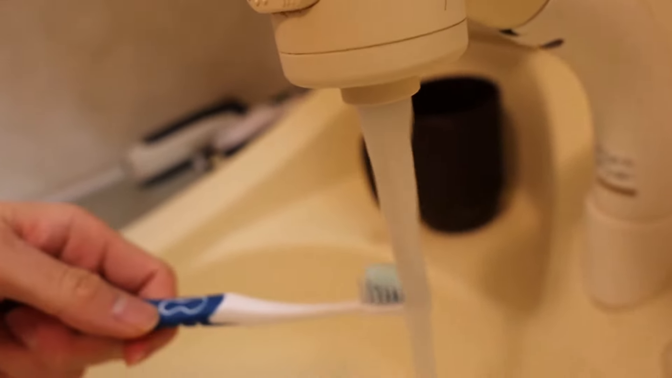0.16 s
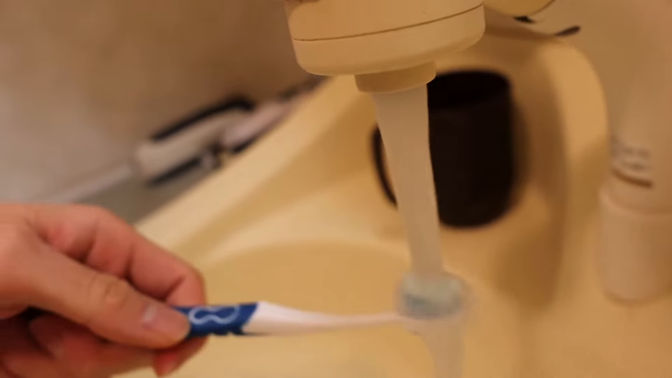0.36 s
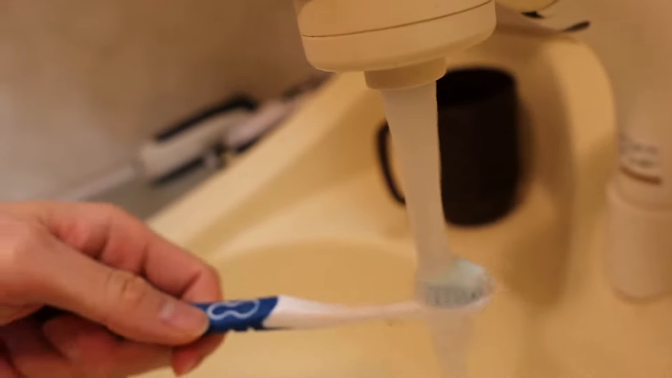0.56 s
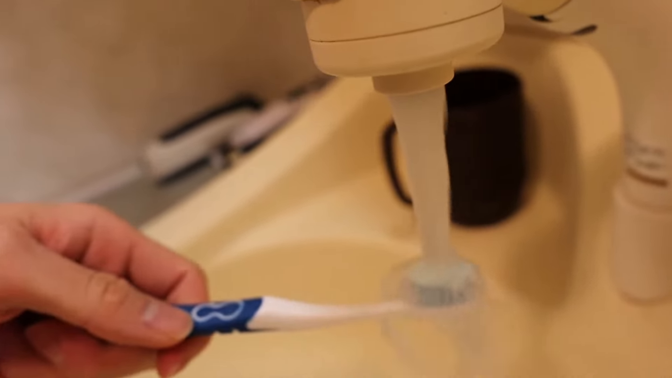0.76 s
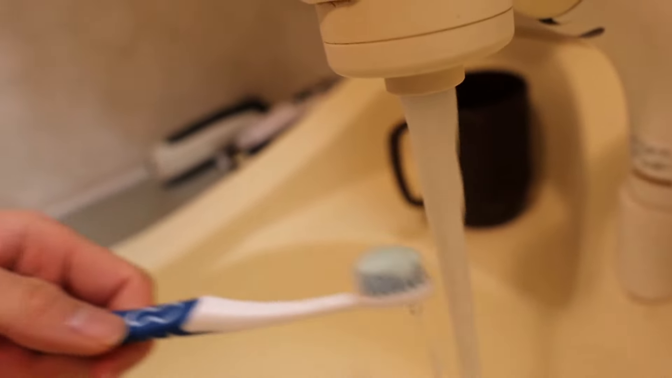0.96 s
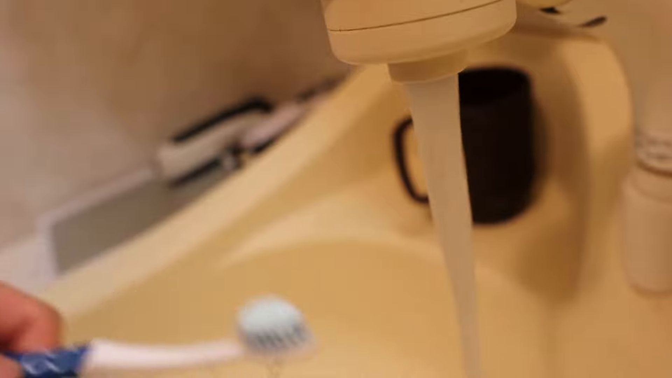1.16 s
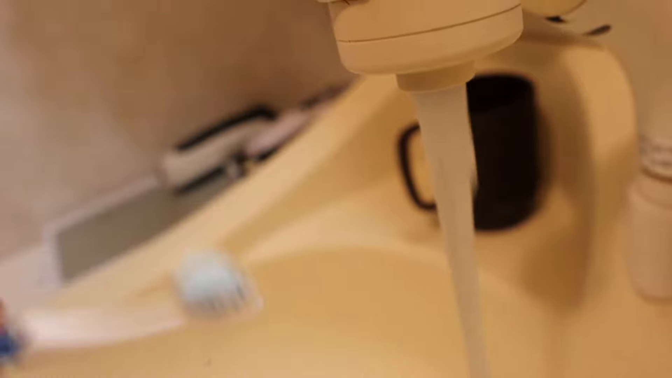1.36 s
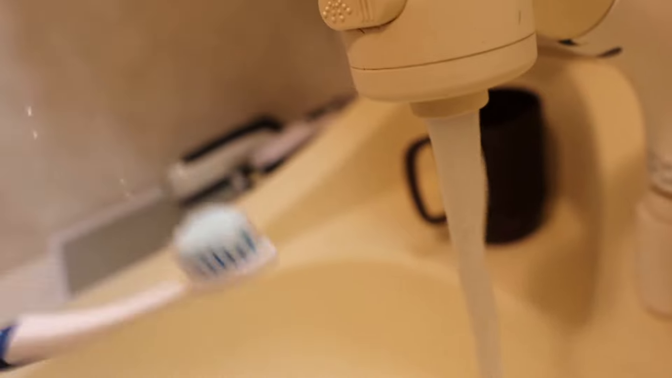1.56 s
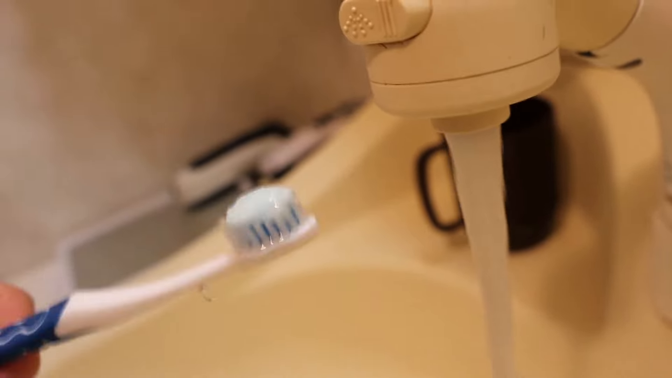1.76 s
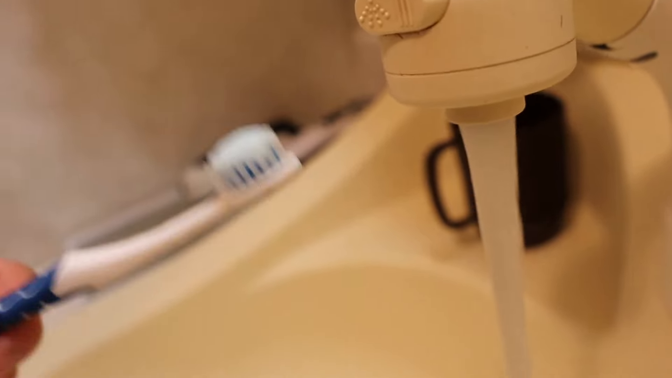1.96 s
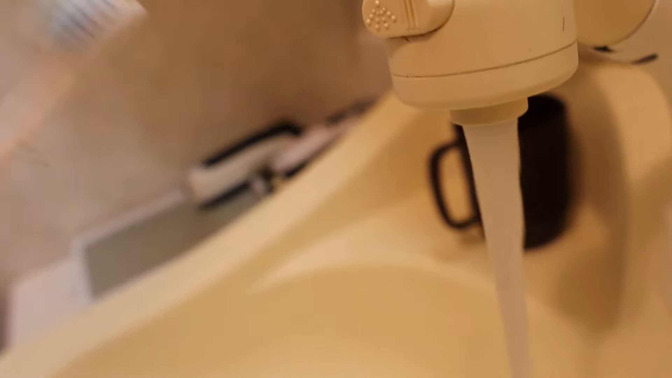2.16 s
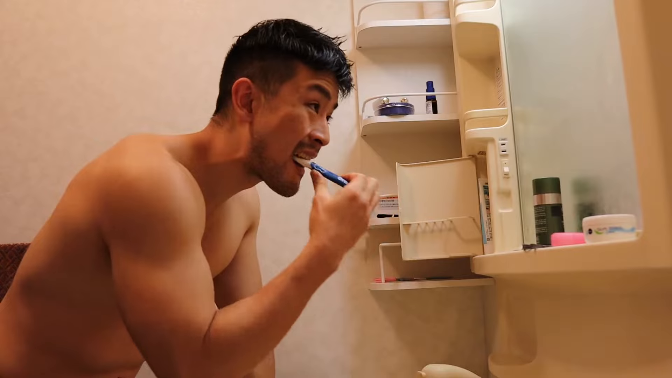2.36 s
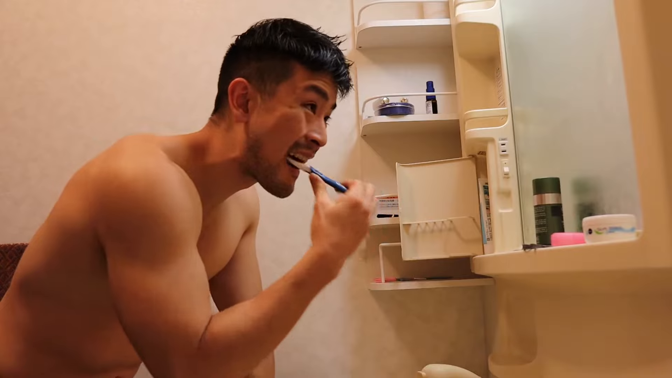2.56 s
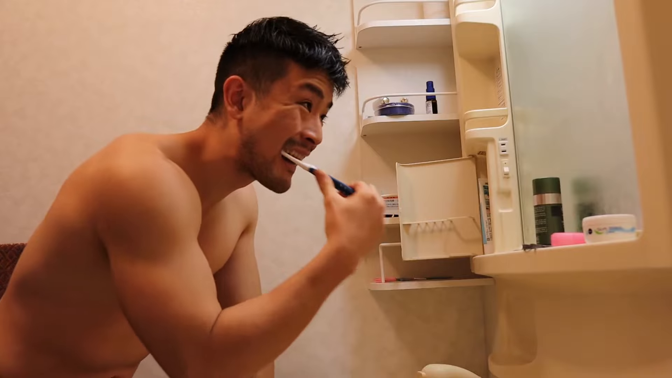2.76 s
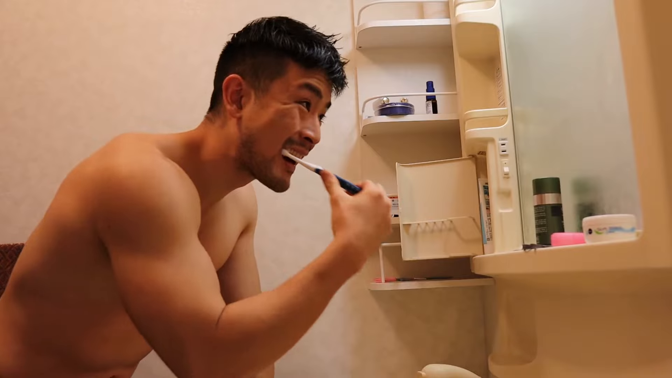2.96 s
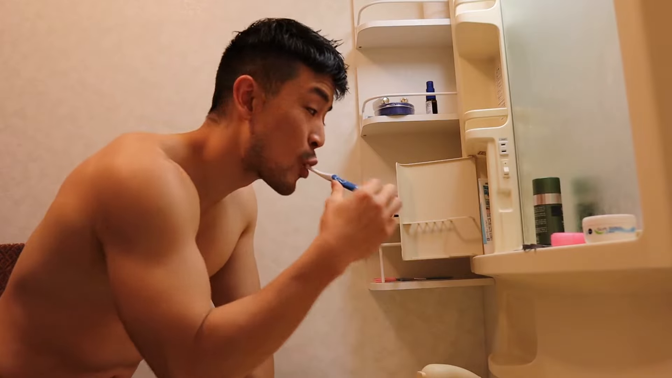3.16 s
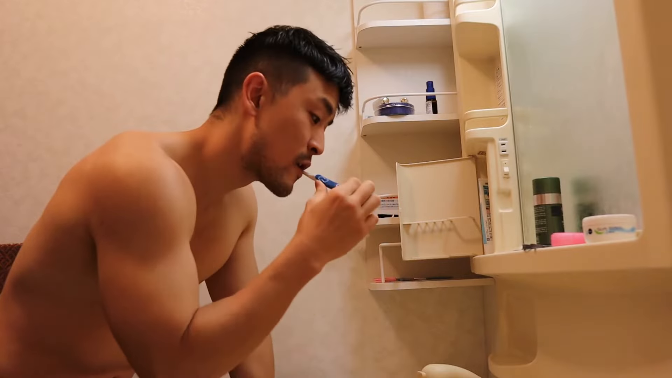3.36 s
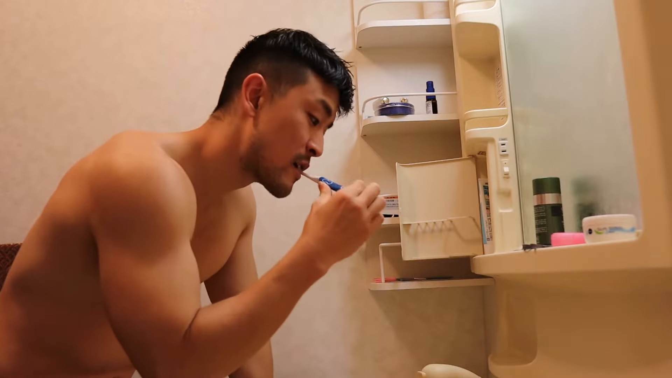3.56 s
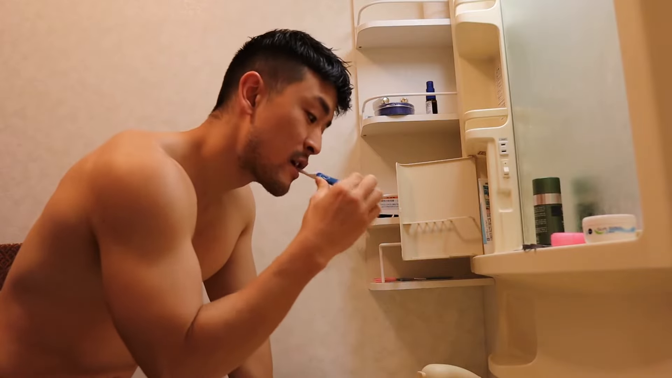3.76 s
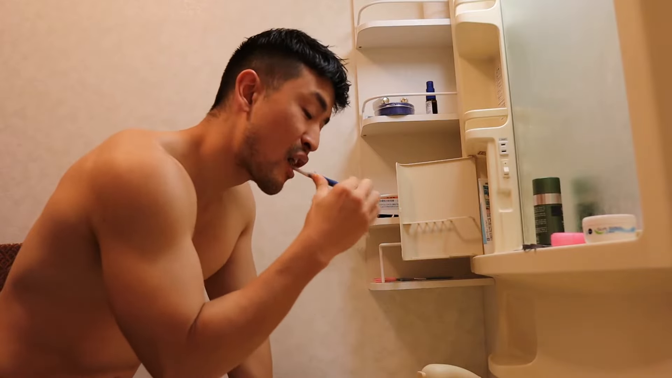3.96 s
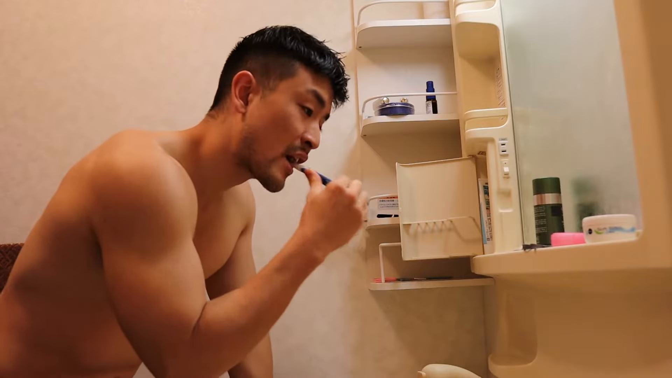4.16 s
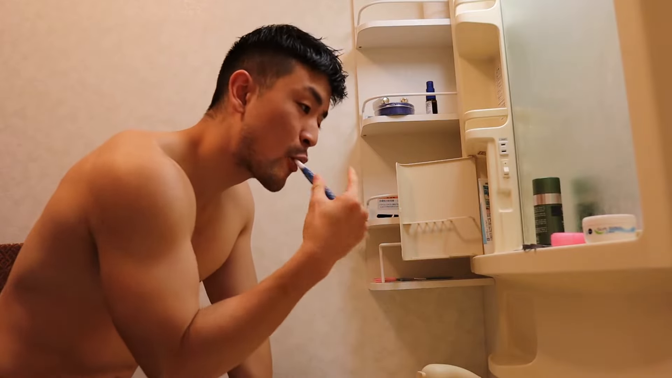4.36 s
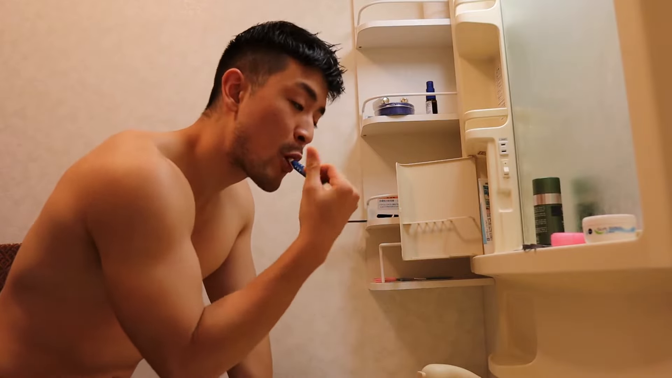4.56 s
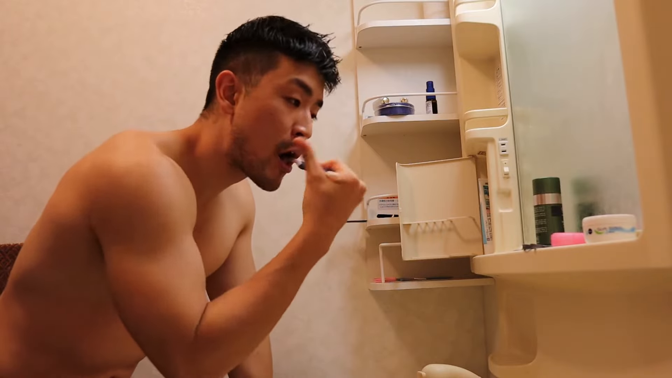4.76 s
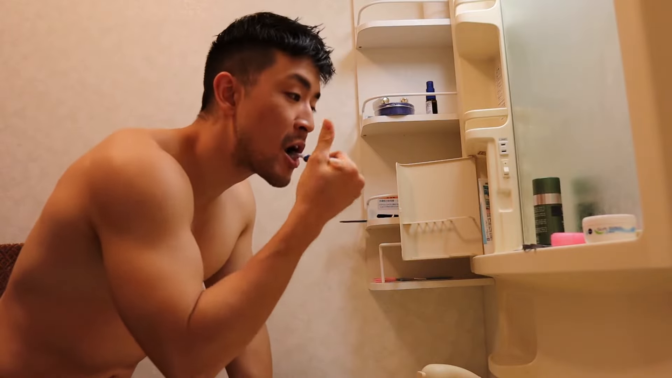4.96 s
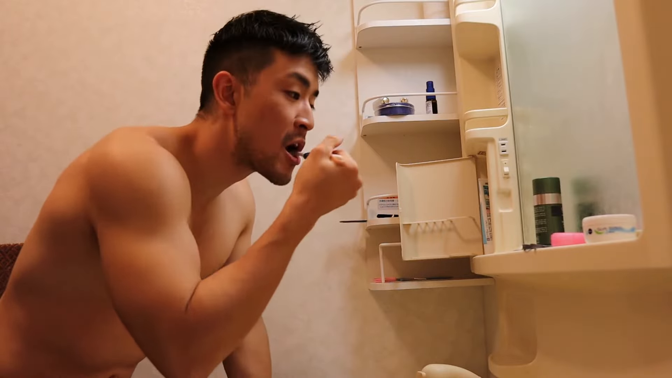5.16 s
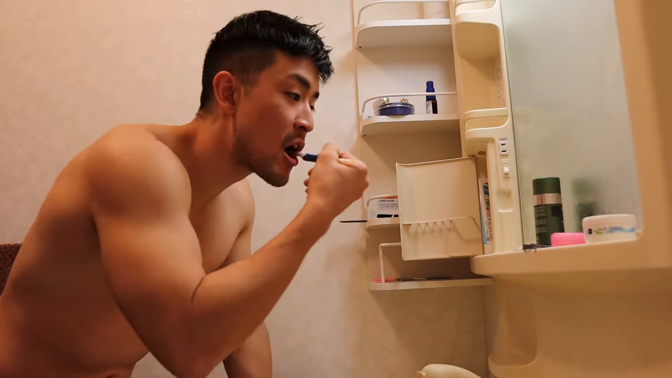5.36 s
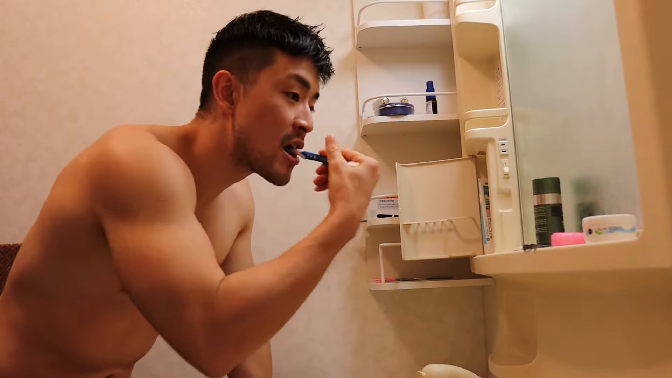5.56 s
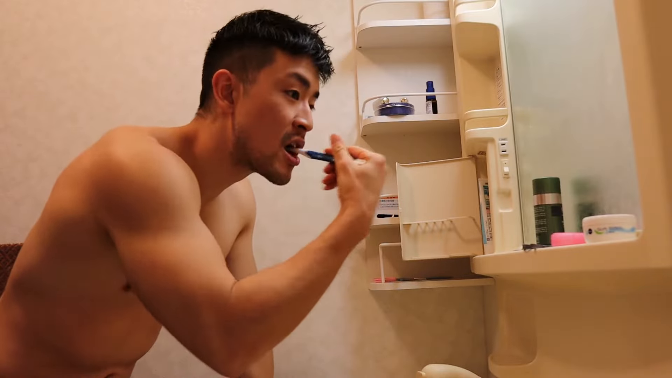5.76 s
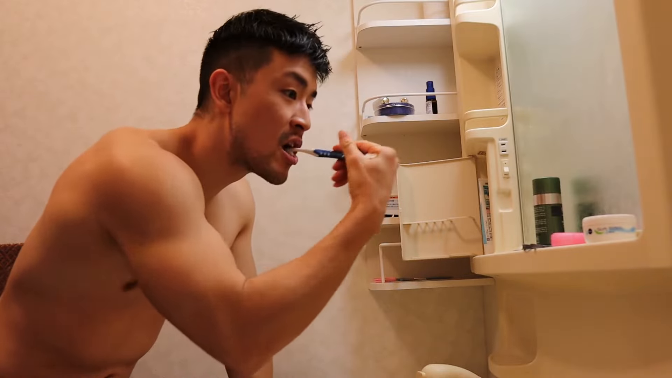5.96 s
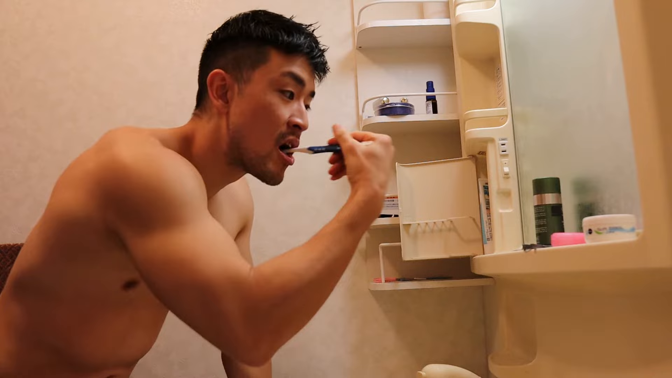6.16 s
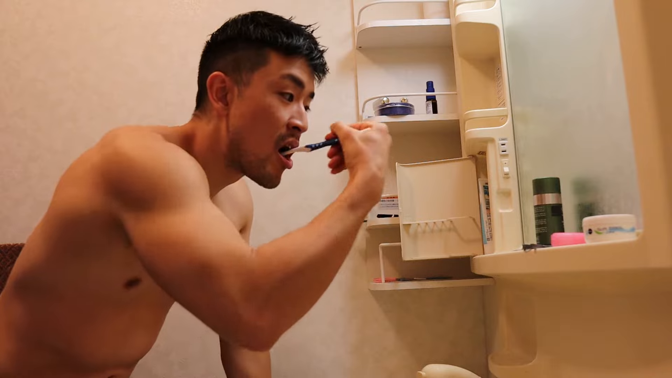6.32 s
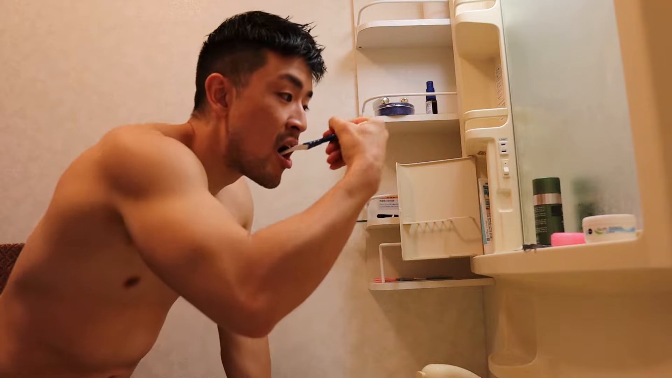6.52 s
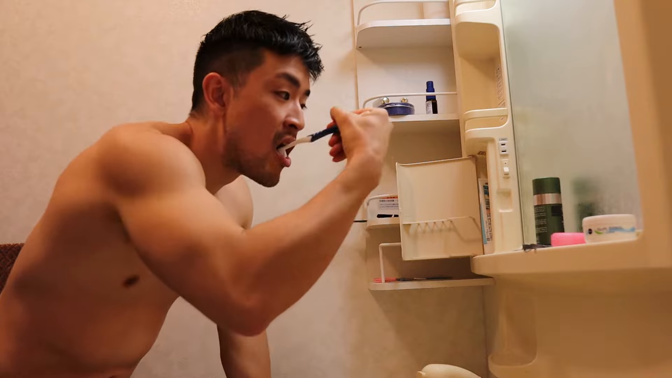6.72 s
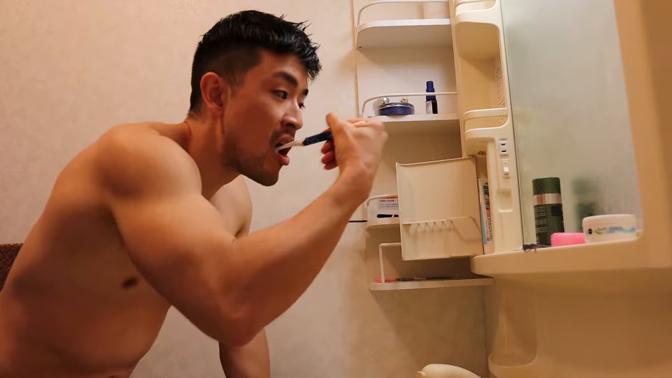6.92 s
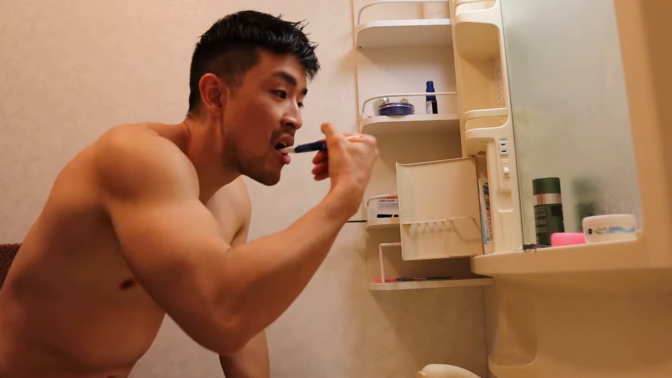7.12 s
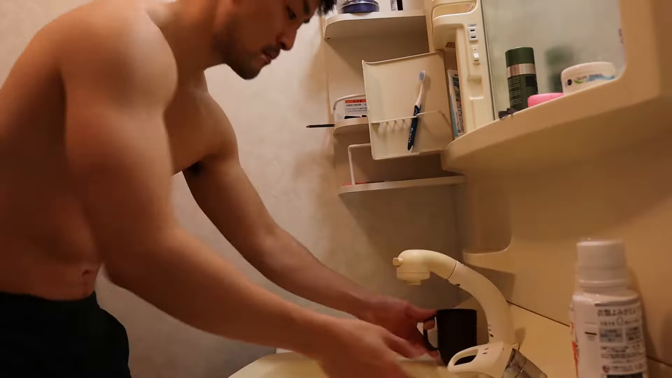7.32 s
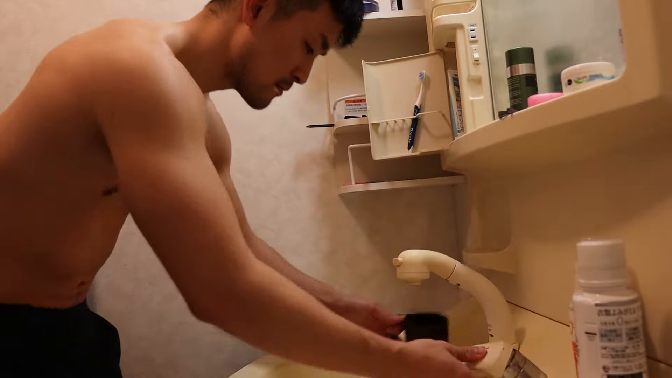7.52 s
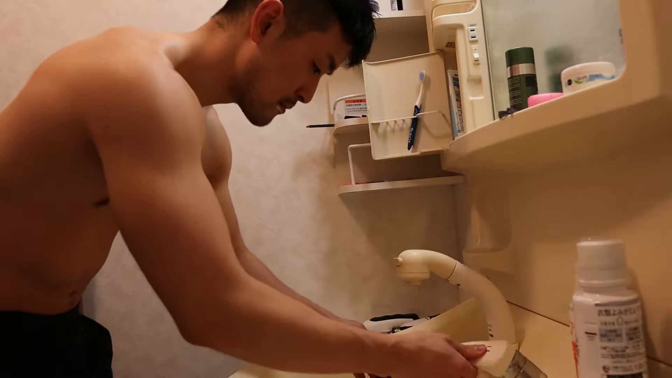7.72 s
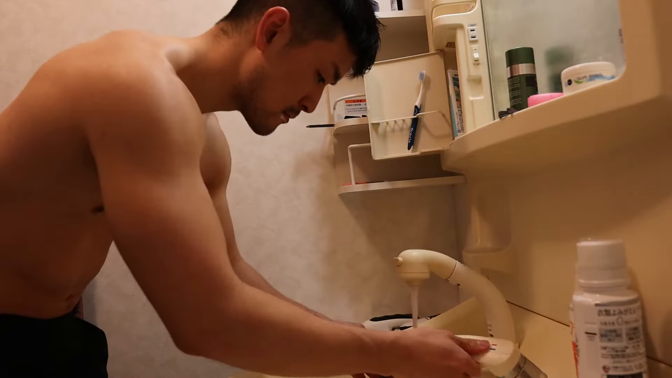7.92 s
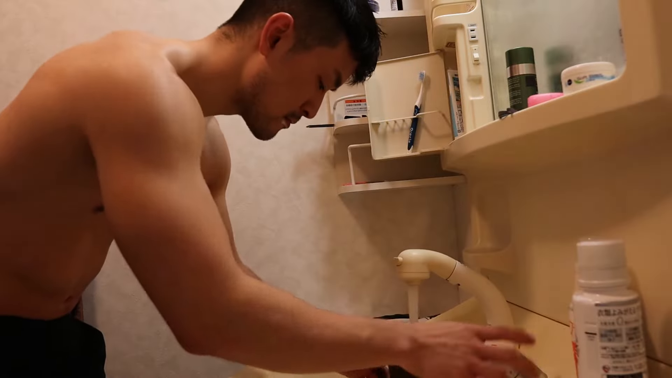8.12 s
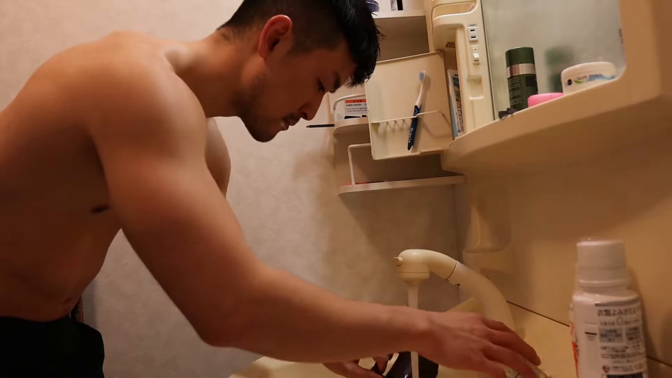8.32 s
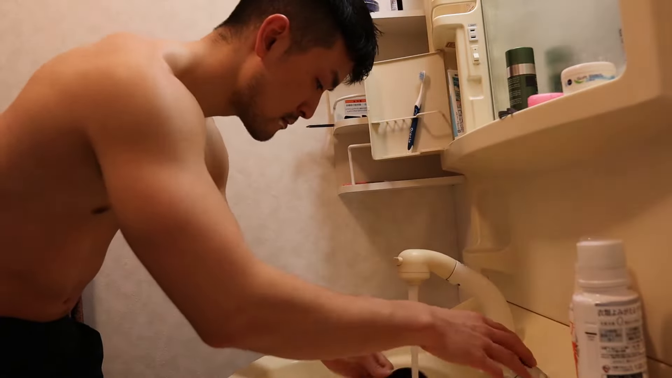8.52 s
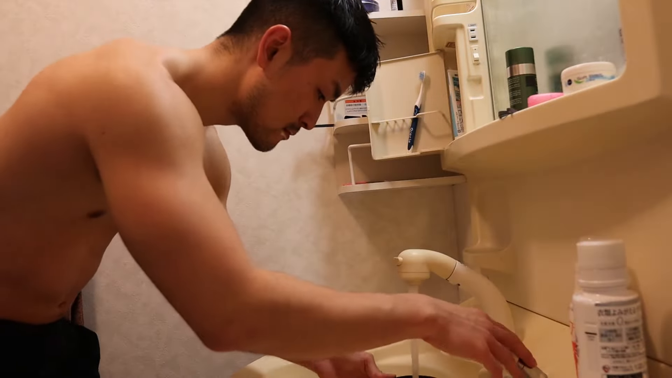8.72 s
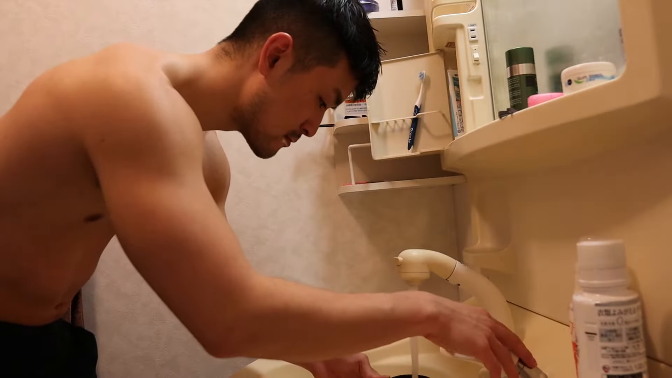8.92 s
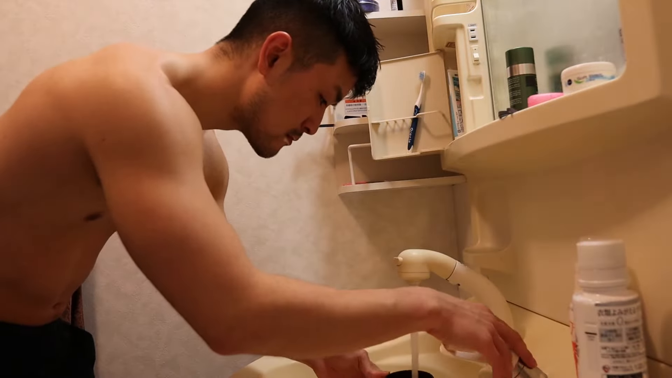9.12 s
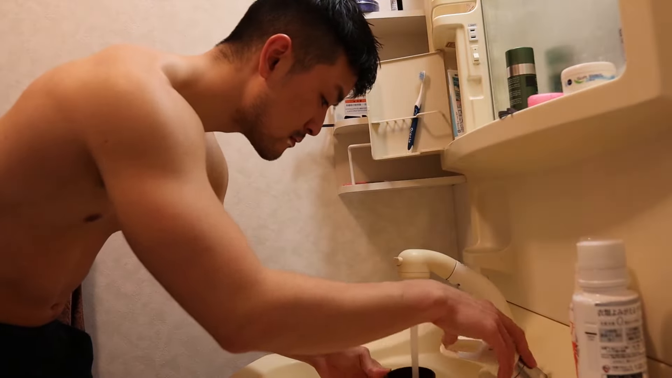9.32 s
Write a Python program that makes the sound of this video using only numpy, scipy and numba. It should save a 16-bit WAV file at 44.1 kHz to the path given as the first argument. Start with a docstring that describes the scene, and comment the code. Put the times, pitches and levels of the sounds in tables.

```python
"""Teeth are scrubbed close by, in bouts of mostly eleven to thirteen strokes a second, in a small bathroom:
bristle flicks excite the moving resonances of a mouth. Before that a tap runs into a plastic basin and
spatters on the toothbrush: random impacts, bubbles and splashes. Afterwards a mug scuffs and knocks in the
basin, as ringing modes, and the tap runs over its rim and into it. Mains hum and ventilation lie underneath."""
import sys
import numpy as np
from scipy import signal
from scipy.fft import rfft, irfft, next_fast_len
from scipy.io import wavfile
from scipy.ndimage import uniform_filter1d, map_coordinates
from numba import njit

SR = 44100
rng = np.random.default_rng(int(sys.argv[2]) if len(sys.argv) > 2 else 0)


def unload_wav(signal):
    """Save mono or channel-first audio to the path in sys.argv[1] as 16-bit WAV at rate SR, clipped to [-1, 1]."""
    wavfile.write(
        sys.argv[1],
        SR,
        np.round(np.clip(np.atleast_2d(signal).T, -1, 1) * 32767).astype(np.int16),
    )


N = 418068
TIME = np.arange(N) / SR  # s

# Levels here are relative: the functions trim and vary them.
# The near tap and the brushing stop short; the tap opens again [s].
NEAR_END_S, BRUSH_END_S, FAR_START_S = 2.283, 7.285, 7.89
TOP_HZ = 15850  # upper limit of the microphone's band

# Mains hum: (time [s], level [dB])
HUM_LEVEL = [(0, -68), (2.27, -69.5), (2.29, -58), (7.24, -58.5), (7.29, -53.5), (9.48, -53.5)]
# Rush of ventilation: (frequency [Hz], density [dB per Hz])
AIR_SPECTRUM = [(25, -2), (100, -4), (170, -3), (310, 1), (470, -2.5), (600, -11.5), (1000, -0.5),
                (2000, -5.5), (5000, -12.5), (15000, -20)]
# Reverberation between close hard walls: (frequency [Hz], t60 [s])
ROOM_DECAY = [(150, 0.43), (400, 0.37), (1000, 0.51), (3500, 0.48), (12000, 0.28)]

# Bumps and knocks on the basin: (time [s], level [dB], hardness of the contact [Hz])
BASIN_KNOCKS = [(3.256, -51.5, 600), (6.065, -41.5, 600), (7.562, -24.5, 5900), (7.568, -10, 560),
                (7.584, -23, 1800), (7.601, -25, 560), (7.681, -20.5, 600), (7.843, -36.5, 700),
                (8.036, -30, 800), (8.391, -29.5, 280)]
# Modes of the basin and the mug in it: (frequency [Hz], level [dB], t60 [s])
BASIN_MODES = [(92, -19, 0.26), (150, -15, 0.088), (228.7, -8.5, 0.18), (301, -6.5, 0.17),
               (278.7, -4, 0.11), (335, 0, 0.039), (379.5, -12, 0.1), (456, -12, 0.067), (793, -5.5, 0.047),
               (862, -4, 0.063), (907, -12, 0.062), (1137, -6.5, 0.039), (1650, -1.5, 0.017),
               (3080, -2, 0.019), (3540, -12, 0.2), (3740, -5, 0.021), (4700, -29, .2)]
# The mug scuffs as it is handled: (time [s], level [dB], length [s])
MUG_SCUFFS = [(7.294, -39, 0.011), (7.37, -34.5, 0.00326), (7.396, -40, 0.011)]
# Resonances of the scuffed mug: (frequency [Hz], width [Hz], level [dB])
SCUFF_MODES = [(355, 125, -5.5), (814, 93, 2.5), (1300, 150, -11), (1980, 880, -18.5)]

# The stream meets a new surface as the mug moves, last of all its inside:
# (time [s], gurgle level [dB], spray level [dB], drumming level [dB], surge [dB])
STREAM_LANDINGS = [(7.903, -52, -54, -65, 15), (8.043, -46.5, -43, -70, 8), (8.19, -42, -44.5, -67.5, 4.5),
                   (8.387, -41.5, -32.5, -50, 0), (8.735, -39, -38, -67, -2.5)]
# The stream dips into the mug and rings its air: (time [s], length [s], level [dB])
MUG_AIR_RINGS = [(8.28, 0.021, -37.5), (8.77, .135, -40)]
# Trapped air gurgles out as the tap opens: (time [s], length [s], level [dB], pitch [Hz])
TAP_COUGH = (7.895, .04, -45, 1080)
# Water churning in the mug: (frequency [Hz], density [dB per Hz])
GURGLE_SPECTRUM = [(200, -16.5), (550, -12), (800, -7), (1000, -6.5), (1170, -3.5), (1400, -9), (2300, -1),
                   (3000, -3.5), (3700, -1), (4400, -7), (5400, -3.5), (7500, -18.5), (15000, -16)]
# Water spraying off the rim: (frequency [Hz], density [dB per Hz])
SPRAY_SPECTRUM = [(900, -31), (2600, -12), (3500, 2), (4400, -4), (5500, 1.5), (7800, -0.5), (9500, -6),
                  (12000, -6), (14500, -12.5), (16000, -19)]
# Water drumming on the basin: (frequency [Hz], density [dB per Hz])
DRUM_SPECTRUM = [(70, -22), (130, -7), (210, -2.5), (340, -5), (480, -12.5), (1500, -42)]
SETTLE_S, SHIFT_S = 0.039, .008  # a surge dies away; the stream crosses to the next surface
# The water deepens in the mug and cushions the stream; the full mug spills onto the basin.
DEEPEN_S, GURGLE_LOSS_DB, SPRAY_LOSS_DB, OVERFLOW_DB = 0.47, 5.5, 12.5, 8
SPUTTER_DB, SPUTTER_RATE = 0.86, 35  # uneven churning: depth, random knots a second
MUG_HZ, MUG_WIDTH_HZ, MUG_ATTACK_S, MUG_RELEASE_S = 842, 63, 0.0096, 0.025
GLUG_START_S, GLUG_DB, GLUG_FADE_DB_PER_S = 8.85, -42, 23  # large bubbles, once there is water to trap them

# Loudest drops bursting near the tap: (time [s], level [dB], pitch [Hz])
DROP_SPLASHES = [(0.1027, -33, 6100), (0.1176, -21.5, 6440), (0.385, -24.5, 5520), (0.9098, -26, 6050),
                 (1.3259, -27, 5470), (1.3737, -29, 3610), (1.5539, -28.5, 6500), (1.6676, -25.5, 5440),
                 (1.717, -29, 3940), (1.7384, -23, 4100), (2.1809, -26.5, 3460), (2.2204, -25, 5640)]
# One large bubble in the drain: (time [s], level [dB], pitch [Hz])
DRAIN_PLOP = (.312, -49, 580)
# Stream hissing on the basin: (frequency [Hz], density [dB per Hz])
STREAM_SPECTRUM = [(100, -14.5), (300, -10.5), (520, -14), (700, -9), (820, -4), (950, -6.5), (1200, 3),
                   (1360, -3.5), (1600, -4), (3000, -5.5), (6000, -5), (9000, -10), (13000, -8.5),
                   (16000, -15.5)]
# Bursts of spatter: (frequency [Hz], density [dB per Hz])
SPATTER_SPECTRUM = [(700, -37), (1600, -15.5), (2300, -3.5), (3300, -6.5), (4000, 3.5), (4600, -3.5),
                    (5600, 3.5), (6700, 2), (7600, -5.5), (10000, -6.5), (16000, -16)]
# Water spills off the brush and drums on the basin: (time [s], level [dB], half length [s])
BRUSH_SPILLS = [(0.661, -53.5, 0.044), (.8, -60.5, 0.035), (1.012, -54, 0.069), (1.197, -65, 0.057)]
SPATTER_DB, DRUM_DB = -42, -68.5  # the bare stream on the basin
# The bristles sit in the stream and soften its spatter: middle, half length, loss.
CUSHION_S, CUSHION_HALF_S, CUSHION_DB = .66, .23, 4

# Bouts of back-and-forth brushing:
# (first stroke [s], last stroke [s], number of strokes, return stroke comes early by [s])
BRUSH_BOUTS = [(2.303, 3.272, 12, .002), (3.414, 4.425, 12, .008), (4.657, 4.795, 2, 0),
               (4.907, 6.172, 16, 0), (6.326, 7.268, 13, .011)]
# How hard the brush bears and where it sits:
# (time [s], pressure level [dB], mouth cavity over that [dB], teeth over that [dB])
BRUSH_PRESSURE = [(2.3, -55, 6.5, 0.5), (2.4, -51, 6, 3), (2.66, -51.5, 5.5, 5.5), (2.8, -57, 6.5, 6.5),
                  (3.02, -56.5, 7, 6.5), (3.1, -60, 4, 0), (3.28, -55, 2, 0), (3.42, -57, 7, -1),
                  (3.62, -50, 5, 0), (3.97, -51, 7, 2), (4.3, -54, 16, 6.5), (4.42, -65.5, 9, 5),
                  (4.65, -75, 16, -4), (4.79, -54, 10.5, 5), (5.12, -54, 14, 2.5), (5.6, -56, 11, 5.5),
                  (5.85, -51.5, 3, 7.5), (6.2, -54.5, 6, 2.5), (6.87, -53.5, 0.5, 5.5),
                  (7.22, -64, 10.5, 9.5), (7.27, -55.5, 16, 7.5)]
# The lips open and round: (time [s], mouth cavity resonance [Hz])
LIPS = [(2.28, 1310), (2.7, 1444), (3.04, 1356), (3.26, 725), (3.37, 960), (3.55, 1190), (4.05, 1297),
        (4.33, 1280), (4.44, 850), (4.57, 1050), (4.64, 760), (4.76, 1190), (5.58, 1202), (5.84, 1068),
        (6.5, 944), (7.27, 990)]
# The tongue moves: (time [s], second resonance of the mouth [Hz])
TONGUE_PLACE = [(2.7, 2570), (3.04, 2420), (3.38, 1900), (4.05, 1790), (4.22, 2400), (4.7, 1870),
                (5.25, 1870), (5.84, 2810), (6.8, 2920), (7.27, 2530)]
# The brush head clicks against the teeth: (time [s], mouth cavity level [dB], tick level [dB])
TEETH_CLICKS = [(2.895, -46, -39), (3.255, -45, -28), (4.116, -34, -35), (4.419, -40.5, -39),
                (4.586, -47, -36.5), (4.756, -44, -32), (4.981, -35, -45), (5.232, -32, -28),
                (5.725, -39, -30.5), (6.159, -42, -44), (6.464, -44, -35)]
# Hiss of the bristles: (frequency [Hz], density [dB per Hz])
BRISTLE_SPECTRUM = [(500, -30), (1550, -22), (1900, -7), (2900, -12), (3900, -3), (4300, -4.5), (4700, 2.5),
                    (5200, -3.5), (6600, -2), (7600, -8), (9500, -12.5), (11000, -11), (13500, -13.5),
                    (16000, -26)]
# Half width as a share of the period, steepness, power left at the turn.
STROKE_WIDTH, STROKE_EDGE, TURN_REST = .25, 3.06, .02
# No two strokes alike: level, share by which the resonances move.
STROKE_SCATTER_DB, JAW_SWAY = 1.26, .021
THIRD_HZ, FOURTH_HZ, FIFTH_HZ = 3288, 3654, 5680  # the upper resonances of the mouth hardly move


def amp(db):
    """Decibels to gain."""
    return 10 ** (np.asarray(db) / 20)


def unit(x):
    """Scale to rms 1."""
    return x / np.sqrt(np.mean(x ** 2) + 1e-20)


def along(points, hz):
    """Read (frequency [Hz], value) points on a log axis."""
    f, v = np.transpose(points)
    return np.interp(np.log(hz + 1), np.log(f + 1), v)


def curves(rows):
    """One value per sample for each column after the time."""
    s, *cols = np.transpose(rows)
    return [np.interp(TIME, s, c) for c in cols]


def wobble(rate):
    """A smooth random curve, rate knots a second."""
    knots = rng.standard_normal(int(N * rate / SR) + 4)
    return map_coordinates(knots, [TIME * rate], order=2)


def swell(s, half_s, edge):
    """A rounded bump of height 1 around time s; a higher edge makes it squarer."""
    return np.exp(-np.abs((TIME - s) / half_s) ** edge)


def add(track, s, sound):
    """Mix a sound into the track from time s."""
    part = track[max(round(s * SR), 0):][:len(sound)]
    part += sound[:len(part)]


def colour(x, spectrum):
    """Causal (minimum-phase) filter with the given spectrum; the result has rms 1."""
    m = 2 * next_fast_len(N // 2 + SR // 8)
    cepstrum = irfft(np.log(amp(along(spectrum, np.fft.rfftfreq(m, 1 / SR)))), m)
    cepstrum[1:m // 2] *= 2
    cepstrum[m // 2 + 1:] = 0
    return unit(irfft(rfft(x, m) * np.exp(rfft(cepstrum)), m)[:N])


@njit
def sweep(x, turn, radius):
    """A two-pole band-pass whose centre and width move from sample to sample."""
    y = np.zeros(len(x))
    for i in range(2, len(x)):
        r = radius[i]
        y[i] = (1 - r) * (x[i] - x[i - 2]) + 2 * r * np.cos(turn[i]) * y[i - 1] - r * r * y[i - 2]
    return y


def resonate(x, hz, width_hz):
    """A resonance of peak gain about 1, fixed or moving."""
    turn = 2 * np.pi * hz / SR * np.ones(N)
    return sweep(x, turn, np.exp(-np.pi * width_hz / SR) * np.ones(N))


def hollow(x, hz, width_hz, skirt):
    """A resonance with steep sides: a second one, skirt times as wide, darkens the valleys."""
    return resonate(resonate(x, hz, width_hz), hz, width_hz * skirt)


def patter(rate, spread_db):
    """Tiny impacts at random times and of clipped log-normal size, rms 1."""
    count = int(rate * N / SR)
    sign = rng.choice([-1, 1], count)
    size = sign * amp(spread_db * np.clip(rng.standard_normal(count), -2.5, 2.5))
    return unit(np.bincount(rng.integers(0, N, count), size, N))


def ping(hz, cycles, rise):
    """A damped resonance swells within a cycle and rings for some cycles (to -60 dB); a bubble's pitch rises."""
    turns = np.arange(int(cycles / hz * SR) + 2) * hz / SR
    u = turns / cycles
    tone = np.sin(2 * np.pi * turns * (1 + rise * u / 2))
    return tone * np.exp(-np.log(1000) * u) * (1 - np.exp(-(2 * turns) ** 2))


def bubbles(t0, t1, rate, hz, scatter, cycles, spread_db):
    """A cloud of bubbles of many sizes between two times, rms 1 while it lasts; scatter in octaves."""
    out = np.zeros(N)
    for when, pitch, size in rng.random((int(rate * (t1 - t0)), 3)):
        bubble = ping(hz * 2 ** (scatter * (2 * pitch - 1)), cycles, rise=0.36)
        add(out, t0 + when * (t1 - t0), amp(spread_db * size ** 2) * bubble)
    return unit(out) * np.sqrt((t1 - t0) / (N / SR))


def room(x, wet_db):
    """Close hard walls; the source keeps moving, so each stretch of sound gets its own decaying noise tail."""
    echo, hop = np.zeros(N), SR // 5
    hz, t, _ = signal.stft(np.zeros(SR // 3), SR, nperseg=256)
    decay = amp(-60 * t / along(ROOM_DECAY, hz)[:, None])
    decay = decay * (1 + 1.06 * np.exp(-t / 0.0056))  # the first reflections are the strongest
    for start in range(0, N, hop):
        noise = signal.stft(rng.standard_normal(SR // 3), nperseg=256)[2]
        tail = signal.istft(decay * noise, nperseg=256)[1]
        reflected = signal.fftconvolve(x[start:start + hop], tail / np.linalg.norm(tail))
        add(echo, start / SR + .0025, reflected)
    return (x + amp(wet_db) * echo) / np.hypot(1, amp(wet_db))  # keep the loudness


def background():
    """Mains hum, a 60 Hz sine, and the faint rush of ventilation, filtered noise."""
    hum = amp(curves(HUM_LEVEL)[0]) * unit(np.sin(2 * np.pi * 60 * TIME))
    return hum + amp(-64.0) * colour(rng.standard_normal(N), AIR_SPECTRUM)


def knocks():
    """Knocks on the basin: the mug lands and rocks, and the stream's surges strike it too. Damped modes and a
    crack; a soft contact weakens the high modes."""
    out, t = np.zeros(N), np.arange(SR // 2) / SR
    hz, level, t60 = np.transpose(BASIN_MODES)[:, :, None]
    for s, db, hard_hz in BASIN_KNOCKS:
        strength = amp(level + rng.normal(0, 2.4, hz.shape)) / np.hypot(1, (hz / hard_hz) ** 1.23)
        tones = np.sin(2 * np.pi * hz * t + rng.normal(0, 0.41, hz.shape))
        ring = np.sum(strength * amp(-60 * t / t60) * tones, axis=0)
        band = signal.butter(2, [140, np.clip(hard_hz, 300, SR / 3)], 'band', fs=SR)
        crack = signal.lfilter(*band, rng.standard_normal(len(t))) * amp(-60 * t / 0.042)
        add(out, s, amp(db - 3.5) * (ring + amp(0.5) * crack) * (1 - np.exp(-t / 0.00071)))
    # the knocks carry no deep bass
    radiated = signal.sosfilt(signal.butter(2, 75, 'high', fs=SR, output='sos'), out)
    return room(radiated, wet_db=-2.0)


def scuffs():
    """The hollow mug is dragged and lifted: rubbing impacts excite its resonances."""
    rub = patter(rate=2500, spread_db=2)
    body = unit(sum(amp(db) * hollow(rub, hz, width, skirt=2.1) for hz, width, db in SCUFF_MODES))
    sound = body * sum(amp(db - 3) * np.exp(-((TIME - s) / length) ** 2 / 2) for s, db, length in MUG_SCUFFS)
    for s, db, length in MUG_SCUFFS:  # each first touch rings the air inside
        add(sound, s - length, amp(db + 4) * ping(830, cycles=40, rise=0))
    return room(sound, wet_db=-4.0)


def landing():
    """Gurgle, spray and drumming in dB: the stream surges on each surface, settles, and changes as the mug fills."""
    starts, *levels, surge_db = np.transpose(STREAM_LANDINGS)
    now = np.maximum(np.searchsorted(starts, TIME) - 1, 0)
    surge = surge_db[now] * np.exp(-np.abs(TIME - starts[now]) / SETTLE_S)
    surging = np.array(levels)[:, now] + surge
    gurgle_db, spray_db, drum_db = uniform_filter1d(surging, int(SHIFT_S * SR))
    depth = 1 - np.exp(-np.maximum(TIME - starts[-1], 0) / DEEPEN_S)
    return gurgle_db - GURGLE_LOSS_DB * depth, spray_db - SPRAY_LOSS_DB * depth, drum_db + OVERFLOW_DB * depth


def gurgle(level_db):
    """Water churns unevenly, as coloured impacts, and froths, as a cloud of rising bubbles."""
    churn = colour(patter(rate=6000, spread_db=3.0), GURGLE_SPECTRUM) * unit(amp(1.4 * wobble(120)))
    froth = bubbles(FAR_START_S, N / SR, rate=500, hz=2615, scatter=1.218, cycles=43, spread_db=11.5)
    return amp(level_db + SPUTTER_DB * wobble(SPUTTER_RATE)) * (amp(3) * churn + amp(-5.0) * froth)


def spray(level_db):
    """Water sprays off the rim: bright, fluttering impacts of uneven size."""
    drops = colour(patter(rate=8000, spread_db=6.5), SPRAY_SPECTRUM)
    return amp(level_db + 1.0) * drops * unit(amp(2.0 * wobble(170)))


def drumming(level_db):
    """Water drums on the basin: the same blows feed a narrow resonance and a broad one."""
    blows = patter(rate=610, spread_db=1.0)
    boom = unit(hollow(blows, 227, 33, skirt=3))
    return amp(level_db) * unit(boom + amp(-2) * colour(blows, DRUM_SPECTRUM))


def mug_air():
    """The stream's impacts ring the air in the mug, with a short rise and a dying tail."""
    level = np.zeros(N)
    for s, length, db in MUG_AIR_RINGS:
        attack = np.clip((TIME - s) / MUG_ATTACK_S, 0, 1)
        level += amp(db) * attack * np.exp(-np.maximum(TIME - s - length, 0) / MUG_RELEASE_S)
    return level * unit(hollow(patter(rate=900, spread_db=4.5), MUG_HZ, MUG_WIDTH_HZ, skirt=2.1))


def trapped_air():
    """Air gurgles out as the tap opens, then large bubbles glug in the mug and fade."""
    s, length, db, hz = TAP_COUGH
    cough = amp(db) * bubbles(s, s + length, rate=700, hz=hz, scatter=.45, cycles=22, spread_db=3)
    glug_db = GLUG_DB - GLUG_FADE_DB_PER_S * np.maximum(TIME - GLUG_START_S, 0)
    glugs = bubbles(GLUG_START_S, N / SR, rate=300, hz=930, scatter=.45, cycles=51, spread_db=5)
    return cough + amp(glug_db) * glugs


def fill():
    """Water sprays off the rim, drums on the basin, then churns in the mug and rings the air above it."""
    gurgle_db, spray_db, drum_db = landing()
    water = gurgle(gurgle_db) + spray(spray_db) + drumming(drum_db) + mug_air() + trapped_air()
    return room(water * np.clip((TIME - FAR_START_S) / .02, 0, 1), wet_db=-1.5)


def spatter():
    """The stream bursts into small flurries of drops and fizzing bubbles, softer where the bristles sit in it."""
    cushion = CUSHION_DB * swell(CUSHION_S, CUSHION_HALF_S, edge=6.8)
    level_db = SPATTER_DB - cushion + 1.0 * wobble(16)
    # each burst starts at once and dies in a few ms
    flurry = signal.lfilter([1], [1, -np.exp(-1 / (0.0032 * SR))], patter(rate=120, spread_db=2.0) ** 2)
    bursts = colour(np.sqrt(flurry) * patter(rate=10000, spread_db=3), SPATTER_SPECTRUM)
    fizz = bubbles(0, NEAR_END_S, rate=280, hz=4610, scatter=1.1, cycles=18, spread_db=16.0)
    return amp(level_db) * (amp(-3.0) * bursts + amp(-8.0) * fizz)


def spills():
    """Water drums low on the basin, swelling as it spills off the brush."""
    level = amp(DRUM_DB) + sum(amp(db) * swell(s, half_s, edge=1.3) for s, db, half_s in BRUSH_SPILLS)
    return level * colour(patter(rate=260, spread_db=3), DRUM_SPECTRUM)


def splash(hz):
    """A drop bursts with a crack and a ring, throws off droplets, and they patter down after it."""
    t = np.arange(SR // 5) / SR
    out = amp(-12) * rng.standard_normal(len(t)) * np.exp(-t / 0.0009)
    add(out, 0, ping(hz, cycles=26.0, rise=0.56))
    for delay, pitch in rng.random((7, 2)):
        droplet = ping(hz * 2 ** (1.4 * (pitch - .5)), cycles=29, rise=0.53)
        add(out, .006 * delay ** 2, amp(-5.5) * droplet)
    for delay, pitch in rng.random((10, 2)):
        fallen = ping(0.703 * hz * 2 ** (1.2 * (pitch - .5)), cycles=23, rise=.4)
        add(out, .05 * delay ** 2, amp(-12) * fallen)
    return out


def rinse():
    """The stream hisses on the basin as dense impacts, spatters, drums and splashes, until it stops short."""
    stream = amp(-47.5) * colour(patter(rate=14000, spread_db=3.0), STREAM_SPECTRUM)
    water = stream + spatter() + spills()
    for s, db, hz in DROP_SPLASHES:
        add(water, s, amp(db + 0.9) * splash(hz))
    s, db, hz = DRAIN_PLOP
    add(water, s, amp(db) * ping(hz, cycles=100, rise=0.048))
    return room(water, wet_db=-6.5) * np.clip((NEAR_END_S - TIME) / 0.0028, 0, 1)


def strokes():
    """Speed of the brush: it peaks in the middle of each stroke and never quite rests at the turn."""
    power = np.zeros(N)
    for first, last, count, early in BRUSH_BOUTS:
        times, period = np.linspace(first, last, round(count), retstep=True)
        u = np.arange(-2, 2, 1 / (period * SR))  # periods from the middle of the stroke
        stroke = np.exp(-np.abs(u / STROKE_WIDTH) ** STROKE_EDGE) + TURN_REST * np.exp(-(u / 0.9) ** 2)
        for k, s in enumerate(times):
            add(power, s - early * (k % 2) - 2 * period, stroke)
    return np.sqrt(power) * amp(STROKE_SCATTER_DB * wobble(12))


def mouth_ring(flicks, hz, width_hz):
    """One mouth resonance; its pitch and strength sway as the brush moves about."""
    moving_hz = hz * (1 + JAW_SWAY * wobble(22))
    ring = hollow(flicks, moving_hz, width_hz, skirt=3.1) / np.sqrt(width_hz)
    return amp(1.35 * wobble(16)) * unit(ring)


def bristle_sound(cavity_hz, cavity_db, teeth_db):
    """Bristle flicks excite five mouth resonances and a broad hiss of their own."""
    second_hz = curves(TONGUE_PLACE)[0]
    flicks = patter(rate=7000, spread_db=5.5)
    # rounded lips let the cavity ring longer
    cavity = amp(cavity_db - 0.93) * mouth_ring(flicks, cavity_hz, 140 * (cavity_hz / 1200) ** 2)
    # bared teeth bring out the second and fourth resonances
    bared_db = np.interp(cavity_hz, [950, 1200, 1400], [-10, -4, -1])
    bared = mouth_ring(flicks, second_hz, 210) + amp(-0.8) * mouth_ring(flicks, FOURTH_HZ, 230)
    scratch = amp(bared_db) * bared + amp(-1.5) * mouth_ring(flicks, THIRD_HZ, 220)
    hiss = amp(-5.0) * mouth_ring(flicks, FIFTH_HZ, 570)
    hiss += amp(-0.54) * colour(patter(rate=6000, spread_db=5.5), BRISTLE_SPECTRUM)
    return cavity + amp(teeth_db) * scratch + hiss


def teeth_clicks(cavity_hz):
    """The brush head clicks on the teeth: the mouth cavity rings and a few tufts tick."""
    out = np.zeros(N)
    for s, ring_db, tick_db in TEETH_CLICKS:
        add(out, s, amp(ring_db) * ping(cavity_hz[round(s * SR)], cycles=48, rise=0))
        for delay, pitch in rng.random((8, 2)):  # tufts snap free together
            tick = ping(4500 * 2 ** (2.1 * (pitch - .5)), cycles=11, rise=0)
            add(out, s + .003 * delay, amp(tick_db - 3) * tick)
    return out


def brushing():
    """Bristles flick over the teeth in each stroke and excite the resonances of the mouth."""
    pressure_db, cavity_db, teeth_db = curves(BRUSH_PRESSURE)
    cavity_hz = curves(LIPS)[0]
    rubbing = amp(pressure_db) * strokes() * unit(amp(2.26 * wobble(190)))  # tufts catch and slip
    scrub = rubbing * bristle_sound(cavity_hz, cavity_db, teeth_db) + teeth_clicks(cavity_hz)
    return room(scrub, wet_db=-3.0) * np.clip((BRUSH_END_S - TIME) / .004, 0, 1)


def scene():
    """Everything at one microphone in the small bathroom."""
    return (background() + knocks() + scuffs() + fill() + rinse() + brushing())[None]


def record(dry):
    """The microphone passes nothing above its band limit."""
    m = next_fast_len(N + SR // 2)
    passed = np.fft.rfftfreq(m, 1 / SR) < TOP_HZ
    return irfft(rfft(dry, m) * passed, m)[:, :N]


dry = scene()
out = record(dry)
unload_wav(out)
```